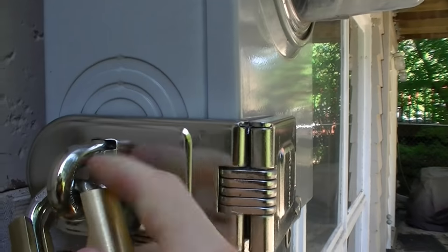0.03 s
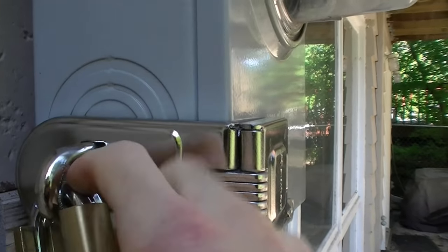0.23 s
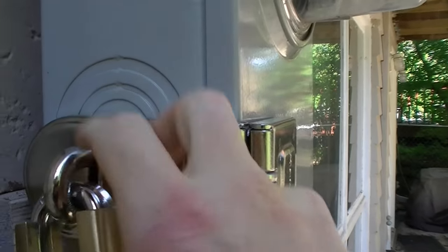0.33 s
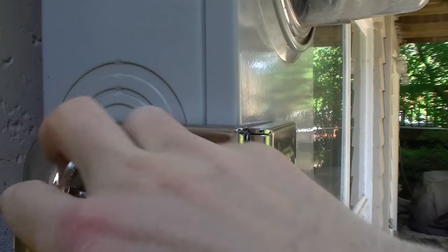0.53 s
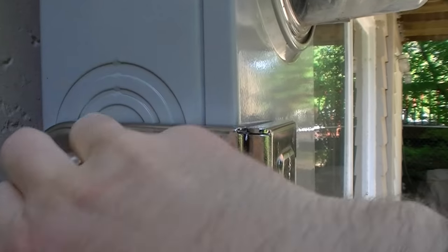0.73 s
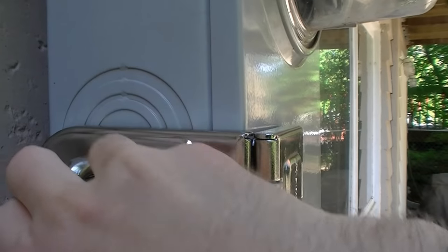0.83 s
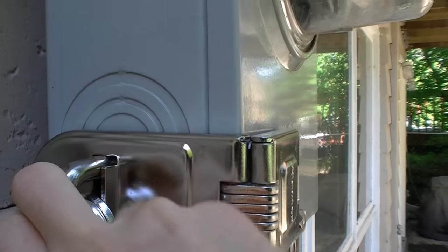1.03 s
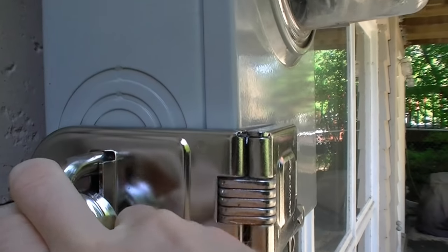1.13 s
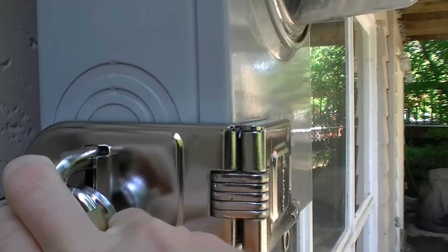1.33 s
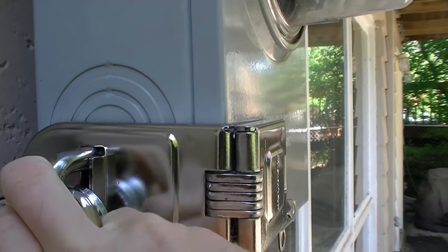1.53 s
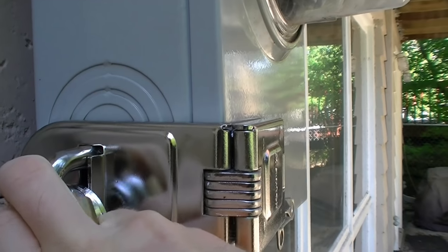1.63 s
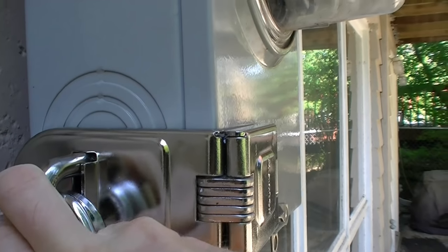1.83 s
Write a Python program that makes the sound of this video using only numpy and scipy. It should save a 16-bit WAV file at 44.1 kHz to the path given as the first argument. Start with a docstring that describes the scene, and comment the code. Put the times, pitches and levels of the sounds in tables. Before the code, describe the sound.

A padlock is turned by hand on a steel hasp, close to the microphone. A quick cluster of sharp clicks comes first, then scattered lighter ones, with soft finger rubbing and door bumps over faint outdoor rumble and hiss.

```python
"""Outdoors at a door, the microphone close to a padlock that a hand turns on its steel hasp.
Each steel contact gives a dry crack and a short ring of the hand-damped lock;
the hasp and the door panel answer lower and longer.
Fingers bump and rub the lock, over a faint steady rumble and microphone hiss."""
import sys
import numpy as np
from scipy import signal
from scipy.fft import irfft
from scipy.io import wavfile
from scipy.ndimage import map_coordinates

SR = 44100
rng = np.random.default_rng(int(sys.argv[2]) if len(sys.argv) > 2 else 0)


def waveform_to_disk(signal):
    """Save audio, clipped to [-1, 1], as 16-bit WAV at the path in sys.argv[1]."""
    frames = np.transpose(np.atleast_2d(signal))
    scaled = np.clip(frames, -1, 1) * 32767
    samples = np.round(scaled).astype(np.int16)
    wavfile.write(sys.argv[1], SR, samples)


N = 83790
T = np.arange(SR // 2) / SR  # seconds since a blow


def amp(db):
    """Decibels to gain."""
    return 10 ** (np.asarray(db) / 20)


def along(points, hz):
    """Read a curve on a log frequency axis."""
    freqs, values = np.transpose(points)
    return np.interp(np.log(hz + 1), np.log(freqs + 1), values)


def noise(colour, width, size, tilt_db=0):
    """Coloured stereo noise of rms 1, tilted by tilt_db per octave above 1 kHz."""
    hz = np.fft.rfftfreq(size, 1 / SR)
    gain = amp(along(colour, hz) + tilt_db * np.log2(np.maximum(hz, 1000) / 1000))
    phases = np.exp(2j * np.pi * rng.random((2, len(hz))))
    mid, side = irfft(phases * [gain, gain * amp(along(width, hz))], size)
    stereo = np.array([mid + side, mid - side])
    return stereo / np.sqrt(np.mean(stereo ** 2) + 1e-20)


def fade(t60_s, attack_s):
    """Quick rise and exponential decay."""
    return np.exp(-np.log(1000) * T / t60_s) * (1 - np.exp(-T / attack_s))


def ring(modes, attack_s, scatter_db=0, detune=0):
    """Damped modes; grip and contact point can change their level and pitch at each blow."""
    out = np.zeros(len(T))
    for hz, db, t60_s in modes:
        level_draw, pitch_draw, phase = rng.standard_normal(3)
        tone = np.sin(2 * np.pi * (hz * (1 + detune * pitch_draw) * T + phase))
        out += amp(db + scatter_db * level_draw) * fade(t60_s, attack_s) * tone
    return out


def add(track, start_s, sound):
    """Mix a blow in at its start time."""
    i = round(start_s * SR)
    track[:, i:i + len(T)] += sound[..., :N - i]


# Spectrum of the open air around the door: freq_hz, relative_db
RUMBLE_COLOUR = [(20, -36), (42, -29), (68, -1), (95, -10), (124, -2), (145, -8), (200, -2), (300, -4),
                 (420, -26.5), (500, -8.5), (640, -11.5), (1000, -13), (1600, -21.5), (3000, -32),
                 (8000, -67)]
# Spectrum of the microphone's hiss: freq_hz, relative_db
HISS_COLOUR = [(1000, 3.5), (3800, -12.5), (4500, 0), (4900, 3.5), (5500, -7), (6800, -4), (8000, 3),
               (8600, -2.5), (9100, -11.5), (12000, -24), (15000, -30), (16000, -44)]
# Stereo width of the background: freq_hz, side_over_mid_db
FAR_WIDTH = [(30, -4), (150, -14.5), (600, -6.5), (2000, -4.5), (5000, -7.5), (8000, -2.5)]


def background(rumble_db=-46, hiss_db=-51.5):
    """Steady outdoor rumble and a wide microphone hiss."""
    rumble = amp(rumble_db) * noise(RUMBLE_COLOUR, FAR_WIDTH, N)
    hiss = amp(hiss_db) * noise(HISS_COLOUR, FAR_WIDTH, N)
    return rumble + hiss


# Rise and fall of the fingers' rub, close up: time_s, level_db
RUB_LEVEL = [(0, -53), (0.2, -43.5), (0.42, -41), (0.54, -59), (0.74, -48.5), (0.98, -46), (1.27, -44.5),
             (1.5, -47.5), (1.64, -46.5), (1.76, -53), (1.9, -52.5)]
# Spectrum of skin on the lock: freq_hz, relative_db
RUB_COLOUR = [(30, -45), (70, -30), (160, 0.5), (330, 2), (480, -8), (900, -8), (1400, -21), (2200, -18),
              (3500, -30), (9000, -45), (15000, -75)]
# Stereo width near the microphone, narrow bass and wide top: freq_hz, side_over_mid_db
NEAR_WIDTH = [(60, -25), (250, -11), (700, -10.5), (2000, -12.5), (4500, -8.5), (8000, -3.5), (13000, 1.5)]


def finger_rub(uneven_db=2.6, uneven_hz=35):
    """Fingers slide over the lock with a low, uneven rub."""
    t = np.arange(N) / SR
    level_db = np.interp(t, *np.transpose(RUB_LEVEL))
    flicker = map_coordinates(rng.standard_normal(200), [t * uneven_hz], mode="mirror")
    return amp(level_db + uneven_db * flicker) * noise(RUB_COLOUR, NEAR_WIDTH, N)


# Steel contacts, close to the microphone: start_s, crack_db, tilt_db_per_octave, crack_t60_s,
# lock_hz, lock_db, shackle_hz, shackle_db, door_db
CONTACTS = [(0.0015, -44, 1, 0.031, 2060, -39, 3450, -35.5, -37),
            (0.043, -38.5, 3, 0.03, 970, -22, 9300, -38, -32.5),
            (0.0643, -45, 1, 0.04, 997, -31, 2150, -33.5, -40),
            (0.093, -41, 2.5, 0.031, 2180, -51, 4200, -42, -39),
            (0.1903, -31.5, -2, 0.024, 1730, -27, 3950, -38, -31.5),
            (0.2642, -10, 1, 0.032, 2046, -6, 5500, -15.5, -27),
            (0.2721, -20.5, 3.5, 0.05, 2700, -18.5, 3900, -18.5, -20.5),
            (0.2924, -24, -1.5, 0.043, 1950, -25, 5460, -38, -37),
            (0.2978, -40, 2, 0.022, 2120, -23, 3950, -31, -29),
            (0.344, -18, 3.5, 0.016, 2010, -7, 3770, -16.5, -26),
            (0.368, -16.5, 3.5, 0.02, 1710, -14, 3040, -17, -25),
            (0.3845, -32, 8, 0.022, 1090, -23, 8600, -40, -35),
            (0.4120, -24, 0, 0.023, 1694, -16.5, 2260, -18.5, -25.5),
            (0.4374, -44, -12, 0.022, 1590, -35, 2240, -27.5, -41),
            (0.4530, -42.5, 4.5, 0.017, 2020, -51, 4460, -44, -40),
            (0.7644, -25.5, 4, 0.016, 1620, -22.5, 4350, -29, -32.5),
            (0.7800, -43, -8, 0.017, 1740, -45, 2880, -30.5, -49),
            (0.9020, -36, -8, 0.019, 2090, -26.5, 2640, -41, -33.5),
            (0.9125, -25, 2, 0.031, 2300, -19.5, 4800, -28, -33.5),
            (0.9668, -35.5, 2, 0.024, 2570, -33.5, 5600, -39, -41),
            (0.996, -23, 1.5, 0.014, 2660, -18, 3160, -20, -38),
            (1.023, -33, -5, 0.016, 2070, -22, 3360, -51, -39.5),
            (1.1185, -36, -1.5, 0.031, 940, -28, 2090, -30.5, -32.5),
            (1.3162, -14, 4, 0.025, 2730, -17, 4330, -15.5, -30),
            (1.325, -18, -4, 0.032, 800, -37, 2440, -13.5, -20.5),
            (1.4331, -47, 7, .02, 2120, -40, 4320, -50, -50),
            (1.4712, -34, -6, 0.0072, 1975, -15, 4240, -28, -33),
            (1.5130, -57, -4, 0.014, 2230, -30, 3670, -52, -44),
            (1.5241, -34, -2, .02, 2390, -35.5, 3950, -33.5, -51),
            (1.5340, -36.5, 15, 0.015, 2400, -31, 10600, -49, -48),
            (1.5667, -45, -4, .02, 2240, -36, 6000, -41, -47),
            (1.5932, -31, -5.5, 0.03, 1620, -30.5, 2280, -32, -30),
            (1.6165, -32, -5, 0.012, 2140, -16, 3580, -32, -32.5),
            (1.6270, -30, -17, 0.051, 550, -44, 2200, -44, -36.5),
            (1.639, -37.5, 3, 0.035, 2250, -44, 5000, -52, -49),
            (1.7281, -38, -5, 0.043, 1025, -35, 2240, -38.5, -39.5)]
# Spectrum of the crack before its tilt: freq_hz, relative_db
CRACK_COLOUR = [(200, -16), (800, 8.5), (1300, 3), (2000, 7), (3000, 0.5), (4500, -1), (6500, -10),
                (8700, -14.5), (11000, -17.5), (13500, -34.5), (16000, -51)]
# Upper modes of the lock, rung by every contact: pitch_hz, level_over_crack_db, t60_s
LOCK_MODES = [(3158, -19, 0.074), (4064, -14.5, 0.025), (4960, -22.5, 0.079), (5330, -19.5, 0.042),
              (6660, -20.5, 0.028), (7870, -20.5, 0.032), (8620, -20, 0.048), (11050, -31.5, 0.033)]


def padlock(crack_attack_s=0.00047, ring_attack_s=0.00061, door_delay_s=0.002):
    """Steel on steel: a crack, short rings of lock and shackle, then the door's answer."""
    out = np.zeros((2, N))
    for (start_s, crack_db, tilt_db, t60_s,
         lock_hz, lock_db, shackle_hz, shackle_db, door_db) in CONTACTS:
        crack = noise(CRACK_COLOUR, NEAR_WIDTH, len(T), tilt_db) * fade(t60_s, crack_attack_s)
        upper_ring = ring(LOCK_MODES, crack_attack_s, detune=0.02)
        # A tight grip damps lock and shackle: both die sooner than the crack.
        held_modes = [(lock_hz, lock_db, 0.71 * t60_s), (shackle_hz, shackle_db, 0.59 * t60_s)]
        main_ring = ring(held_modes, ring_attack_s, scatter_db=0.5)
        add(out, start_s, amp(crack_db) * (crack + upper_ring) + main_ring)
        add(out, start_s + door_delay_s, amp(door_db) * door())
    return out


# Dull pushes on the door, close and centred: start_s, level_db, pitch_hz
BUMPS = [(0.003, -29, 169), (0.066, -26, 174), (0.227, -21, 208), (0.246, -26, 316), (0.2700, -13.5, 277),
         (0.371, -19.5, 351), (0.971, -26, 269), (1.029, -34, 310), (1.570, -27.5, 243),
         (1.615, -26.5, 519.4), (1.652, -27, 520), (1.790, -34.5, 523)]


def hand_bumps(t60_s=0.087, attack_s=0.0076):
    """Hand and lock push against the door, each time with one soft, low tone."""
    out = np.zeros((2, N))
    for start_s, level_db, pitch_hz in BUMPS:
        add(out, start_s, amp(level_db) * np.sin(2 * np.pi * pitch_hz * T) * fade(t60_s, attack_s))
    return out


# Clear modes of hasp and door panel, just behind the lock: pitch_hz, relative_db, t60_s
DOOR_MODES = [(122.7, -23, 0.22), (207.3, -11, 0.093), (270.1, -6.5, 0.23), (332.3, -4.5, 0.28),
              (415.6, -8, 0.15), (523, -8, 0.21), (665, -13.5, 0.32), (753.7, -7.5, 0.2),
              (854.4, -10, 0.22), (1000, -4, 0.087), (1080, -6, 0.046), (1529, -7, 0.081),
              (1630, -13.5, 0.12), (2025, -12.5, 0.068), (2670, -27, 0.042)]
# Spectrum of the door's dense modes: freq_hz, relative_db
CLATTER_COLOUR = [(30, -42), (80, -11), (180, -15), (320, -7.5), (450, -1), (590, -18.5), (850, -4.5),
                  (1300, -11), (1600, -10), (2200, -6), (3200, -19), (5000, -23.5), (9000, -25),
                  (15000, -45)]
# Ring time of those dense modes: freq_hz, t60_s
CLATTER_DECAY = [(200, 0.37), (550, 0.19), (1400, 0.11), (3700, 0.14), (10000, 0.077)]


def door(clatter_db=-8.5, modes_db=-2, attack_s=0.0015):
    """The door answers a contact with clear modes and a dense clatter whose treble dies first."""
    hz, t, spectrum = signal.stft(noise(CLATTER_COLOUR, NEAR_WIDTH, len(T)), SR, nperseg=256)
    decay = np.exp(-np.log(1000) * t / along(CLATTER_DECAY, hz)[:, None])
    _, clatter = signal.istft(spectrum * decay, SR, nperseg=256)
    clatter = clatter[:, :len(T)] * (1 - np.exp(-T / attack_s))
    modes = ring(DOOR_MODES, attack_s, scatter_db=1.0, detune=0.004)
    return amp(clatter_db) * clatter + amp(modes_db) * modes


def scene():
    """Lock, door and hand up close, the open air behind."""
    return padlock() + hand_bumps() + finger_rub() + background()


def record(dry):
    """The camera's microphone cuts the bass below 45 Hz and the treble above 16 kHz."""
    low_cut = signal.butter(3, 45, "high", fs=SR, output="sos")
    band_limit = signal.ellip(10, 0.1, 90, 16000, fs=SR, output="sos")
    return signal.sosfilt(band_limit, signal.sosfilt(low_cut, dry))


dry = scene()
out = record(dry)
waveform_to_disk(out)
```